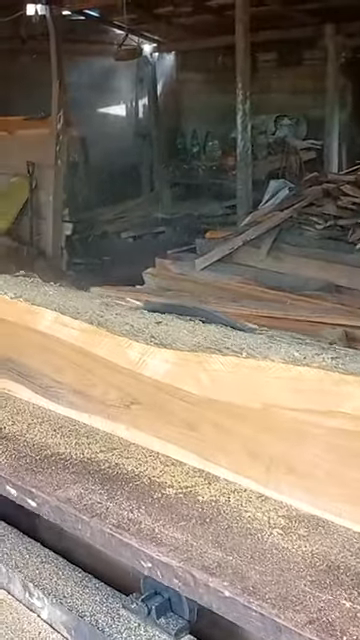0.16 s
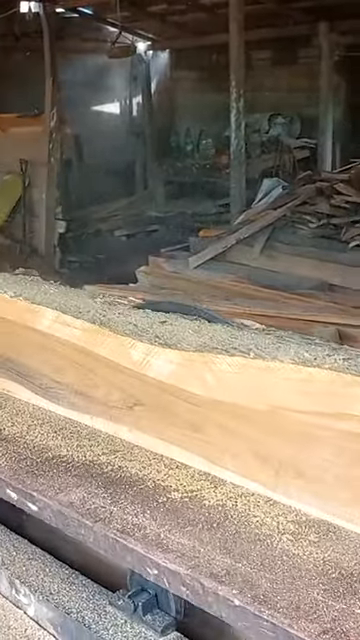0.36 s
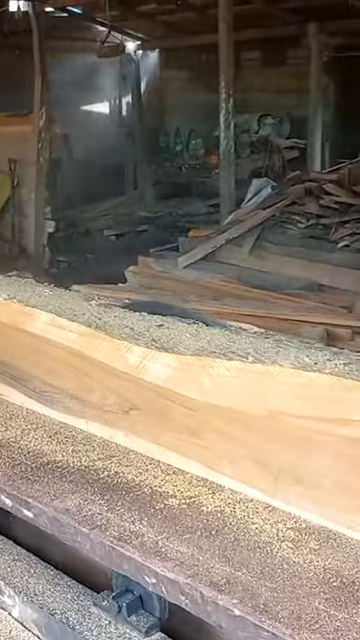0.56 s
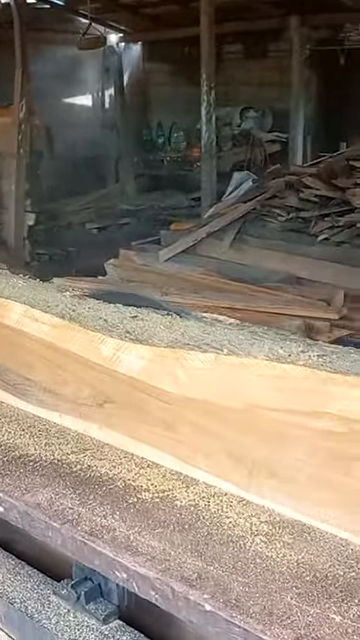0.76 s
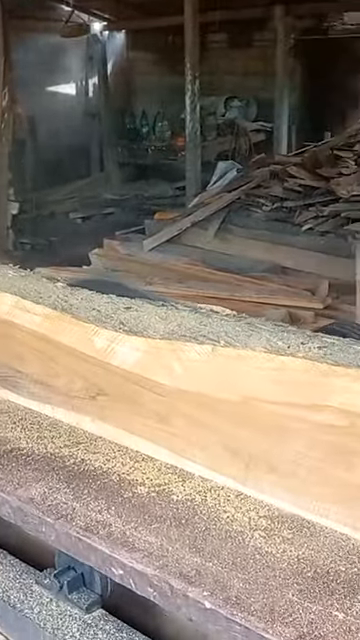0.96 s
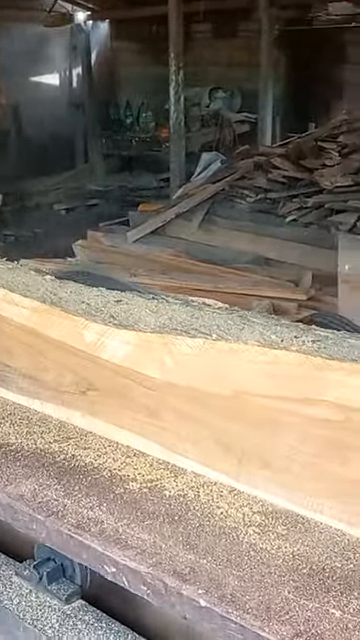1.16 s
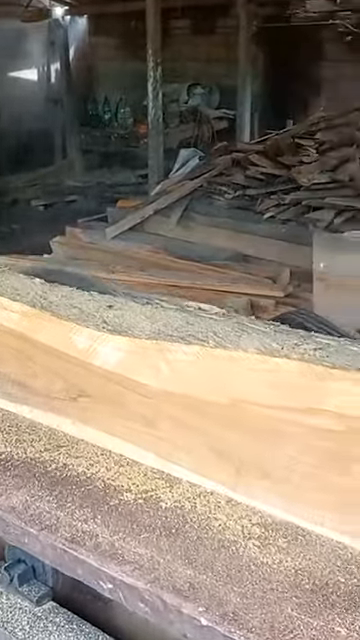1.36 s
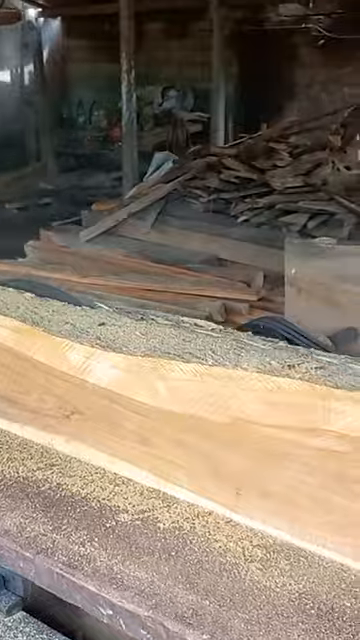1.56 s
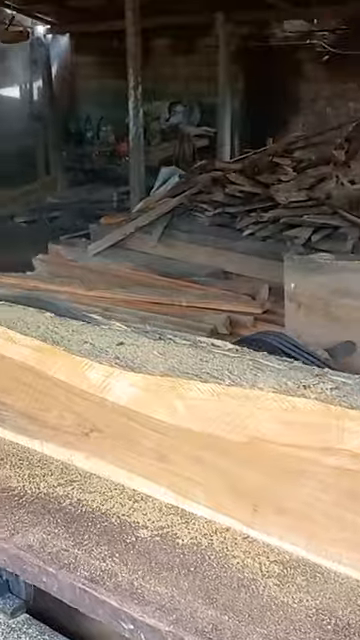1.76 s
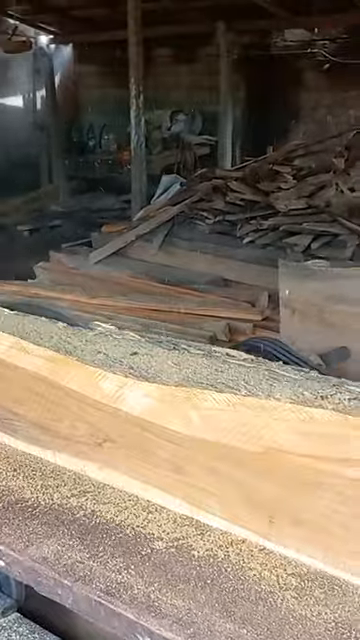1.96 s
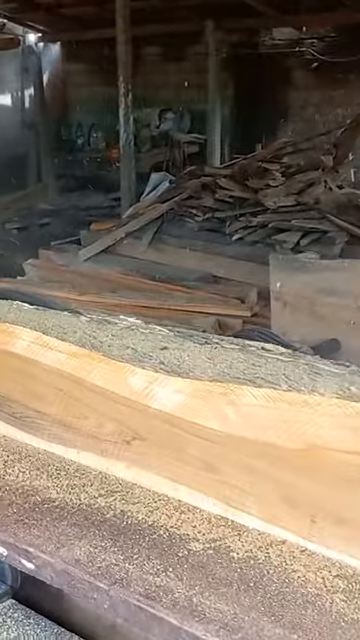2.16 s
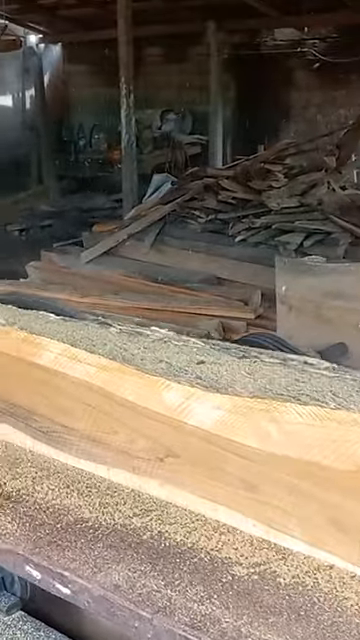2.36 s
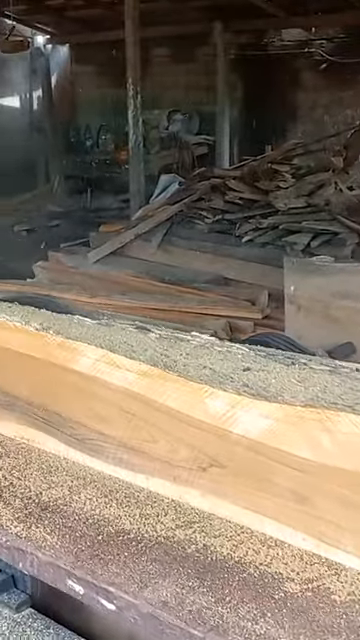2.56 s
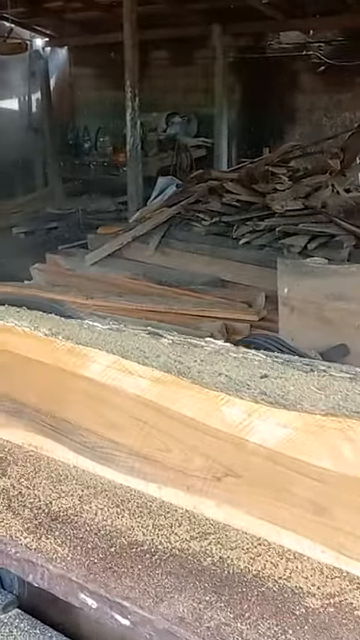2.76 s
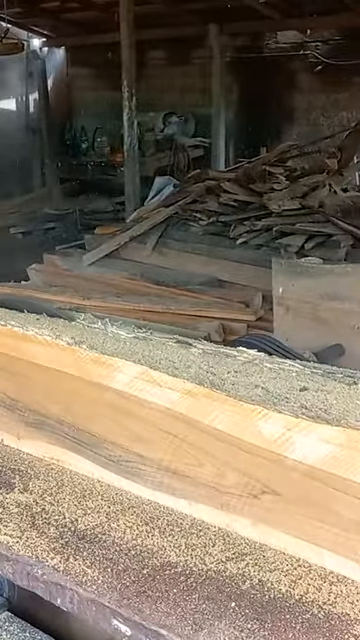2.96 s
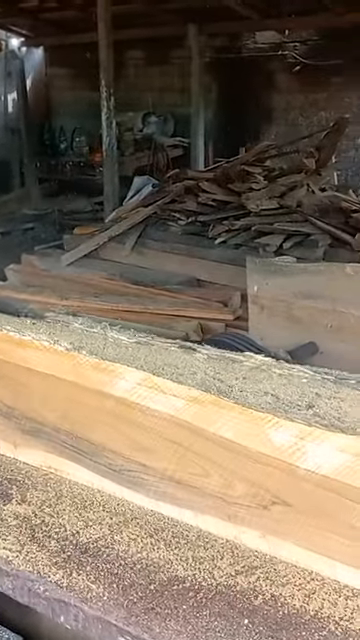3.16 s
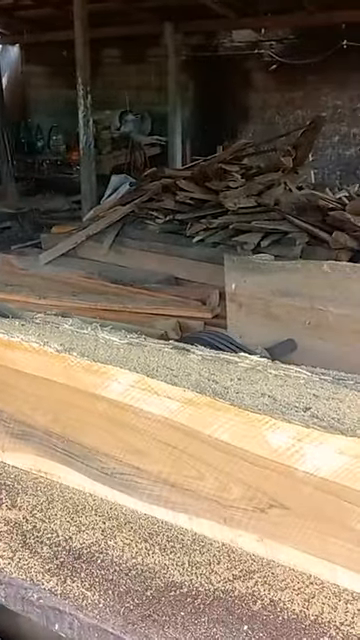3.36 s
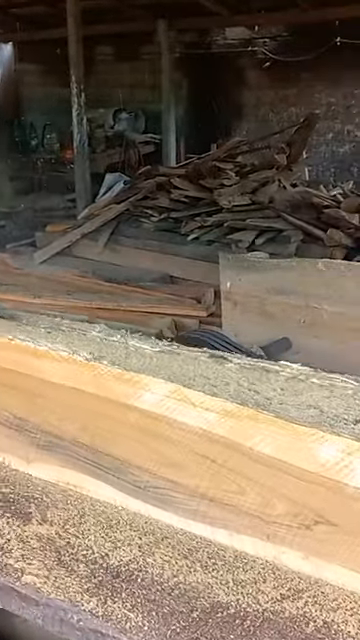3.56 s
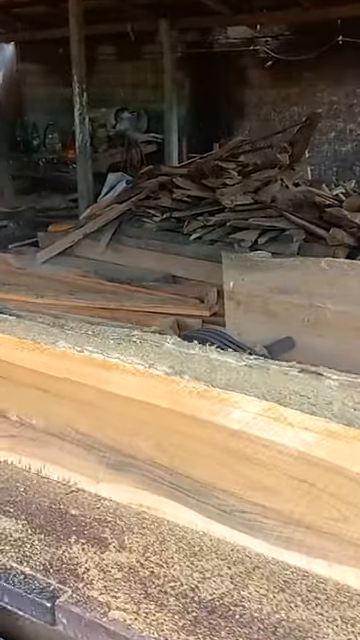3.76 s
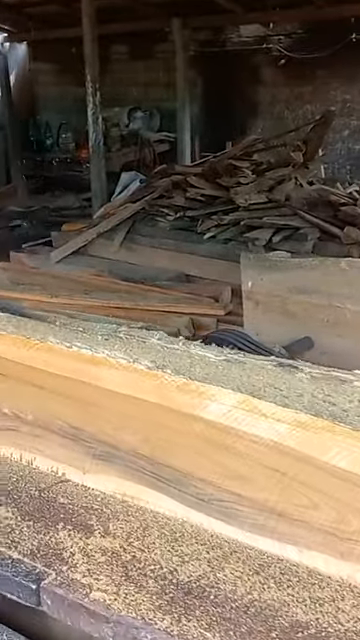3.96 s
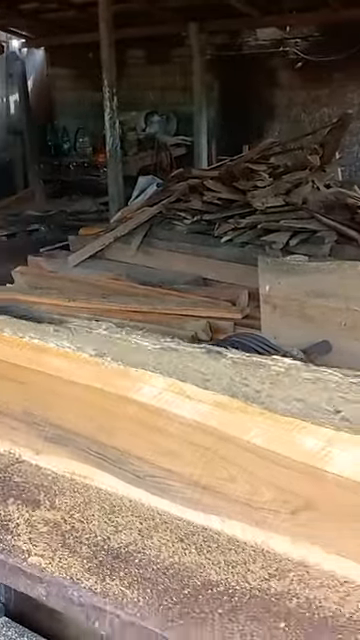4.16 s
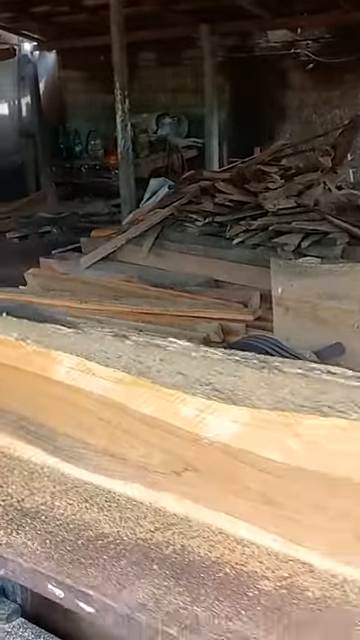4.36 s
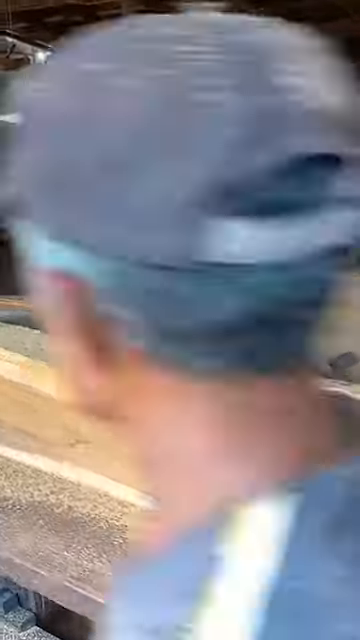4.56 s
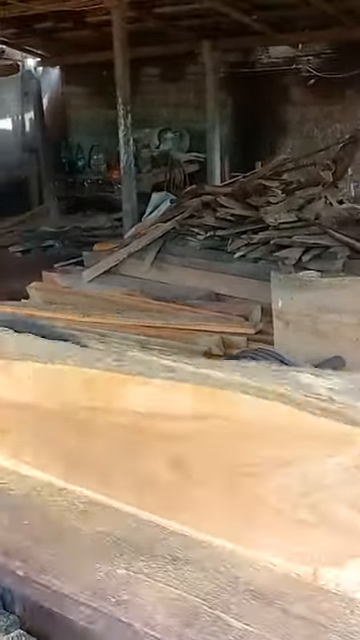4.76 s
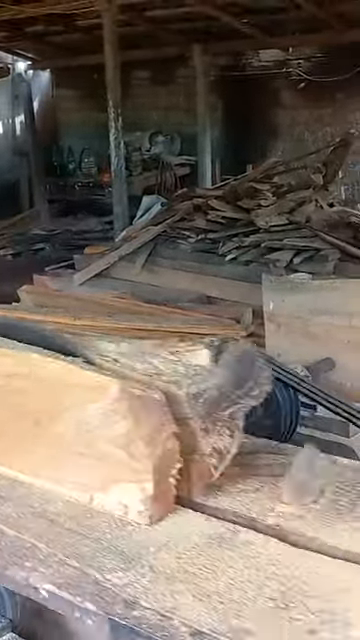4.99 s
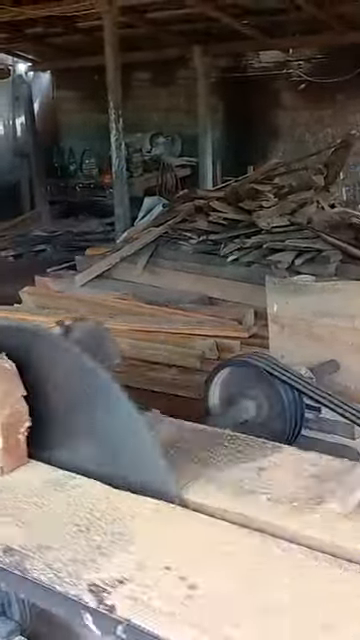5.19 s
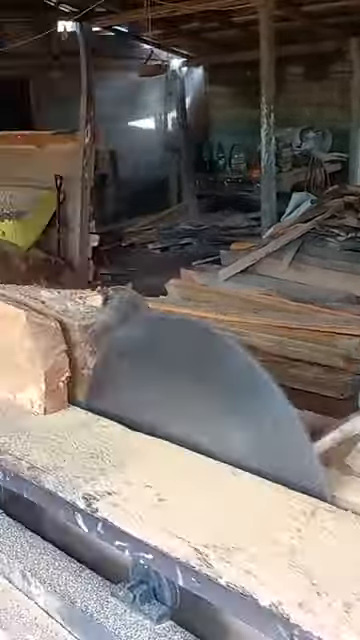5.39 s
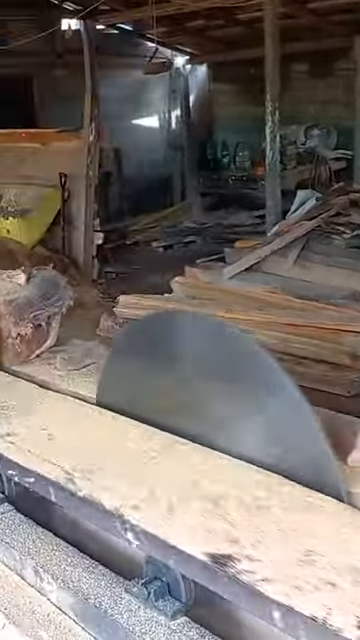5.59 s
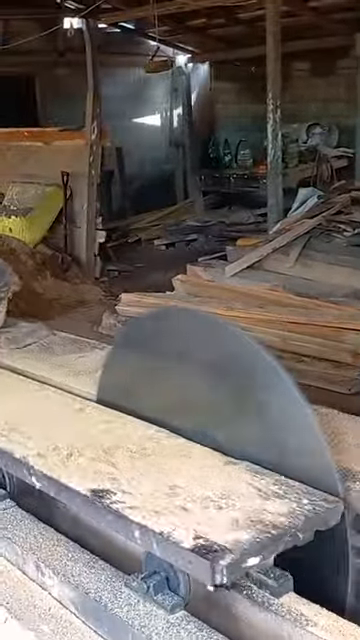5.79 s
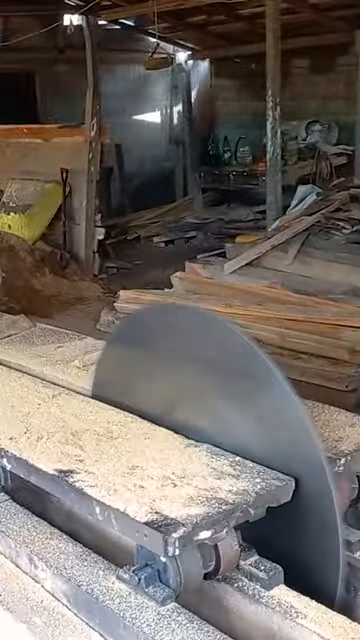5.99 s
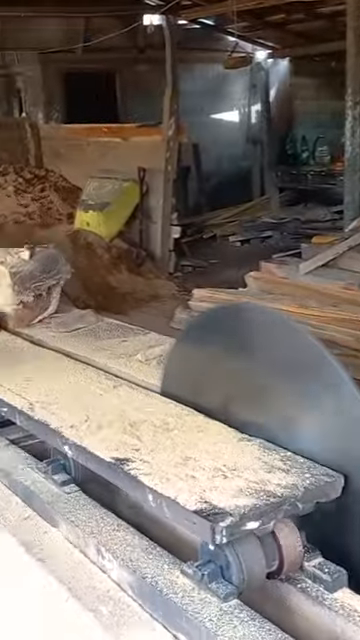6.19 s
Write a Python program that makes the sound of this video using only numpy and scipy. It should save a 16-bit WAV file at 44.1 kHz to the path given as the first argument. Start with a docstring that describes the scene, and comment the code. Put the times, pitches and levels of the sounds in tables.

```python
"""A large 30-tooth circular saw rips a plank in an open shed, a couple of metres from a phone.
Tearing fibres give noise bursts, the tooth rate gives harmonics, and scratches ring the blade's modes.
The feed surges, so the blade slows and bites harder in turn; then it skims the kerf and sings, and runs free.
Broad noise stands for the drive and wheels; the carriage knocks as decaying modes, squeaks as narrow hiss
near the top of hearing, and bangs at the end."""
import sys
import numpy as np
from scipy import signal
from scipy.fft import rfft, irfft
from scipy.io import wavfile
from scipy.ndimage import uniform_filter1d, map_coordinates

SR = 44100
rng = np.random.default_rng(int(sys.argv[2]) if len(sys.argv) > 2 else 0)


def nominal_scale(level):
    """Amplitude ratio for a level in decibels (scalar or array-like)."""
    x = np.asarray(level, float) / 20
    return 10 ** x


def transcribe(u):
    """Save the signal u as a 16-bit wav file named by the first command-line argument.

    u: samples, shape (n,) or (channels, n), limited to [-1, 1]; the rate is SR.
    q: integer samples, one column per channel.
    """
    v = np.clip(np.atleast_2d(u).T, -1, 1)
    q = np.round(v * 32767).astype(np.int16)
    wavfile.write(sys.argv[1], SR, q)


N = 274743
TIME = np.arange(N) / SR
BINS = np.maximum(np.arange(N // 2 + 1) * SR / N, 1)  # Hz

TEETH = 30
SKIM_S, SING_S, FREE_S = 3.65, 3.98, 4.89  # the blade skims the kerf, then sings, then runs free

# Blade speed with no push from the feed. Each row: time in seconds, tooth rate in Hz.
UNLOADED_SPEED = [(0, 1589), (3.62, 1589), (3.76, 1600), (4.85, 1599), (4.91, 1621)]
# Surges of the feed. Each row: start in seconds, length in seconds, sag of the tooth rate in Hz before smoothing.
FEED_SURGES = [(-.11, .17, 42), (.07, .19, 32), (.28, .18, 29), (.47, .15, 25), (.67, .2, 25),
               (.88, .18, 26), (1.06, .13, 23), (1.19, .16, 51), (1.43, .2, 38), (1.65, .16, 39),
               (1.83, .17, 44), (2.0, .39, 31), (2.4, .16, 40), (2.57, .18, 54), (2.78, .21, 54),
               (3.01, .17, 59), (3.17, .22, 31), (3.43, .3, 37)]
# Tearing between surges, before the load adds to it. Each row: time in seconds, level in dB.
TEARING_LEVEL = [(0, -22.5), (.8, -23), (2, -23), (3.3, -24), (3.7, -22), (3.9, -23.5), (4.0, -21),
                 (4.2, -17.5), (4.4, -21), (4.7, -19), (4.86, -21.5), (4.91, -39), (4.95, -55)]
# Spectrum of torn fibres and chips. Each row: frequency in Hz, relative density in dB per Hz.
TEARING_SPECTRUM = [(180, -57), (300, -23.5), (418, -12.5), (737, -14.5), (1560, -4), (2000, -5.5),
                    (2250, -1), (4830, -2), (7200, -5), (11300, -2.5), (16000, 3.5)]
# Modes of the blade plate. Each row: frequency in Hz, width of one resonance in Hz, relative level in dB.
BLADE_MODES = [(1080, 130, -5), (1350, 150, -11), (1860, 70, -6), (2240, 110, -1), (2600, 160, -6),
               (3220, 110, -7), (4710, 130, -9), (6880, 50, -12), (7930, 110, -11), (9570, 80, -4),
               (10080, 60, -5), (11100, 110, -3), (11700, 90, -9), (12700, 130, -9), (14200, 150, -9)]
# Lowest blade modes, until the blade runs free. Each row: time in seconds, level in dB.
LOWEST_MODES_LEVEL = [(0, -40), (.3, -31.5), (1.1, -39), (2.6, -37), (2.95, -29.5), (3.15, -34),
                      (3.45, -28.5), (3.88, -38), (4.2, -28.5), (4.7, -27), (4.95, -42)]
# Tooth tone in the wood, before load and slack.
# Each row: time in seconds, then first, second and third harmonic in dB.
TOOTH_HARMONICS = [(0, -41.5, -36, -32), (.35, -27.5, -32.5, -31.5), (.65, -35, -30, -32),
                   (1.0, -32, -30, -33.5), (1.3, -34.5, -37.5, -32), (1.6, -35.5, -38, -29),
                   (1.9, -48, -37.5, -33), (2.4, -41.5, -44, -32.5), (2.8, -47, -38, -39),
                   (2.9, -34, -34, -36), (3.05, -40, -37, -36), (3.42, -45.5, -42.5, -42),
                   (3.76, -35, -25.5, -34.5), (3.85, -47, -43, -49), (4.28, -38, -25.5, -33),
                   (4.45, -38.5, -40, -40), (4.7, -39, -25, -38), (4.9, -40, -43, -50)]
# Higher tooth harmonics, before slack and wavering. Each row: multiple of the tooth rate, dB against the tearing.
UPPER_HARMONICS = [(4, -17), (5, -15), (6, -20.5), (7, -12), (8, -11.5), (9, -13), (10, -13)]
# Spectrum of motor, belts, blade wind and carriage wheels. Each row: frequency in Hz, relative density in dB per Hz.
DRIVE_SPECTRUM = [(200, -25), (260, -20.5), (365, -5.5), (680, -11), (870, -6.5), (2300, -7), (3500, -8.5),
                  (4970, -7.5), (6000, -14), (11000, -19.5), (16000, -19.5)]
# The drive as heard: the phone's gain control lifts drive noise and whistle together after the cut
# and ducks them after the bang. Each row: time in seconds, reference level in dB.
DRIVE_AS_HEARD = [(0, -53), (2, -47), (3.95, -44.5), (4.5, -47.5), (4.93, -40), (5.2, -34.5), (5.5, -35),
                  (5.87, -32), (5.95, -39), (6.17, -40.5), (6.23, -31)]
# Carriage knocks and the end bang. Each row: start in seconds, peak in dB, brightness in Hz.
CARRIAGE_BLOWS = [(.912, -21.5, 1500), (1.012, -21, 1400), (1.112, -17.5, 1500), (1.217, -21, 1500),
                  (1.326, -15.5, 1900), (1.429, -11, 2570), (1.533, -18.5, 1400), (5.331, -12, 3500),
                  (5.349, -18, 3500), (5.8906, -5, 3800), (5.896, -4, 2400), (5.904, -9, 1910),
                  (5.913, -2.5, 3800), (5.918, -5, 3370), (5.928, -12, 3180)]
# Modes a knock excites. Each row: frequency in Hz, relative level in dB, 60 dB decay time in seconds.
FRAME_MODES = [(289.7, -8, 0.11), (434, -2, 0.047), (1035, 6.5, 0.027), (1406, 3.5, 0.026),
               (2010, -5, 0.089), (2394, -2, 0.035), (3184, 2.5, 0.025), (3450, -5, 0.026),
               (3930, -4, 0.059), (4520, -6.5, 0.049)]
# Thin squeaks while the carriage rolls. Each row: start in seconds, length in seconds, level in dB.
CARRIAGE_SQUEAKS = [(4.925, 0.12, -33), (5.155, .12, -31), (5.33, 0.058, -33), (5.41, 0.077, -26),
                    (5.547, .05, -34), (5.6, .07, -36)]
# Left-right difference against the sum. Each row: frequency in Hz, level in dB.
STEREO_WIDTH = [(100, -8), (250, -16), (700, -11), (1290, -20), (2380, -14.5), (4400, -6.5), (8120, -0.5),
                (15000, -1)]


def curves(table):
    """Linear interpolation: the columns of a table, joined by straight lines in time."""
    s, *columns = np.transpose(table)
    return [np.interp(TIME, s, c) for c in columns]


def unit(x):
    """Normalization: scale to rms 1."""
    return x / np.sqrt(np.mean(x ** 2))


def colour(x, points):
    """Spectral shaping: weight each frequency by (Hz, dB) points joined on a log axis."""
    hz, db = np.transpose(points)
    return irfft(rfft(x) * nominal_scale(np.interp(np.log(BINS), np.log(hz), db)), N)


def ring(x, hz, width_hz):
    """Resonance: a two-pole filter with gain 1 at the centre."""
    return signal.lfilter(*signal.iirpeak(min(hz, .45 * SR), hz / width_hz, SR), x)


def walk(rate):
    """Random modulation: levels held for 1 / rate seconds and slewed twice, scaled to rms 1."""
    k = int(SR / rate)
    held = np.repeat(rng.standard_normal(N // k + 1), k)[:N]
    return unit(uniform_filter1d(uniform_filter1d(held, k), k))


def tooth_rate():
    """Inertia: each surge drags the blade down, it recovers a little faster, and its mass rounds the corners."""
    sag = 0
    for s, length, sag_hz in FEED_SURGES:
        bite_s = min(.55 * length, .13)
        ease_s = min(.38 * length, .1)
        surge = np.minimum((TIME - s) / bite_s, (s + length - TIME) / ease_s)
        sag = sag + sag_hz * np.clip(surge, 0, 1)
    return curves(UNLOADED_SPEED)[0] - uniform_filter1d(sag, int(.04 * SR))


def scratch(turns, memory, fresh):
    """Periodicity: noise that returns every turn and slowly changes, mixed by power with new noise."""
    size = 28 * TEETH  # noise points around the rim
    keep = np.exp(-1 / memory)  # memory in turns
    rim = signal.lfilter([1], [1, -keep], rng.standard_normal((400, size)), axis=0)
    rim = rim[40:].ravel()  # the first turns only settle the filter
    again = unit(map_coordinates(rim, [turns * size], order=3))
    fresh = np.clip(fresh, 0, 1)
    return np.sqrt(1 - fresh) * again + np.sqrt(fresh) * rng.standard_normal(N)


def runout(turns, depth_db, lobe_db):
    """Amplitude modulation by rotation: the blade is not true, so some teeth bite deeper on every turn."""
    once = depth_db * np.cos(2 * np.pi * turns)
    thrice = lobe_db * np.cos(2 * np.pi * 3 * turns)
    return nominal_scale(once + thrice)


def tearing(turns, load, tear_db):
    """Random fracture: fibres tear in bursts of uneven size, and bands of the noise flicker on their own."""
    again = scratch(turns, memory=12.0, fresh=.6 + .1 * load)
    chips = nominal_scale(2.3 * walk(900)) * again * runout(turns, depth_db=1.47, lobe_db=-0.7)
    torn = unit(colour(chips, TEARING_SPECTRUM))
    bands = sum(nominal_scale(2.73 * walk(8)) * ring(torn, hz, 0.35 * hz) for hz in 400 * 1.35 ** np.arange(12))
    return nominal_scale(tear_db - 3.0) * bands


def blade(turns, load, tear_db):
    """Plate resonance: the repeating scratch rings the blade's modes, whose levels waver at random."""
    # fresh wood under load breaks the repeat
    again = scratch(turns, memory=16.0, fresh=.1 + .25 * load)
    push = again * runout(turns, depth_db=2.0, lobe_db=0.8)
    lowest_db = curves(LOWEST_MODES_LEVEL)[0] - 30.0 * np.clip((TIME - FREE_S) / .3, 0, 1)
    # dB against the tearing: weaker in the wood, stronger when singing
    sing_times = [SING_S - .02, SING_S + 0.022]
    low_db = tear_db + np.interp(TIME, sing_times, (-12, -7))
    high_db = tear_db + np.interp(TIME, sing_times, (-11.5, -6.5))
    out = 0
    for hz, width_hz, db in BLADE_MODES:
        mode_course_db = lowest_db if hz < 1500 else low_db if hz < 4000 else high_db
        waver_db = 2.0 * walk(8)
        # the second, wider resonance makes the skirts fall faster
        mode = unit(ring(ring(push, hz, width_hz), hz, 3.0 * width_hz))
        out = out + nominal_scale(db + mode_course_db + waver_db) * mode
    return out


def tooth_tone(turns, load, tear_db):
    """Periodic forcing: harmonics of the tooth rate; the overtones grow with load and weaken in slack."""
    first, second, third = curves(TOOTH_HARMONICS)
    # out of the wood the teeth whistle in the air, under the same gain control as the drive noise
    free = np.clip((TIME - FREE_S) / 0.027, 0, 1)
    heard_db = curves(DRIVE_AS_HEARD)[0]
    first = first + free * (heard_db + 2.5 - first)
    second = second + free * (heard_db - 10.5 - second)
    third = third - 12.0 * free
    # only between surges, when the feed eases, does the blade lift off the wood
    slack = np.clip(2.5 * (.45 - load), 0, 1) * (TIME < SKIM_S)
    levels = [(1, first), (2, second + 2.7 * load - 10.0 * slack), (3, third + 2.15 * load - 13.0 * slack)]
    upper_drop_db = 18.0 * np.maximum(slack, TIME > SKIM_S)
    levels += [(k, db + tear_db - upper_drop_db + 3.6 * walk(9.01)) for k, db in UPPER_HARMONICS]
    # uneven teeth shift each bite by a pattern that comes back every turn; high multiples smear most
    pattern = scratch(turns, memory=3.9, fresh=0.4)
    uneven = unit(uniform_filter1d(uniform_filter1d(pattern, 90), 90))
    # in the wood the same pattern, 300 samples later, sets how hard each tooth bites
    bite = 1 + .45 * np.roll(uneven, 300) * np.clip(nominal_scale(tear_db + 30), 0, 1)
    out = 0
    for k, db in levels:
        wobble = k ** 2 * (.025 * uneven + .006 * walk(60))  # radians
        wave = np.sqrt(2) * np.sin(k * 2 * np.pi * TEETH * turns + wobble)
        out = out + nominal_scale(db + 1.2 * walk(25)) * bite * wave
    return out


def drive():
    """Broadband radiation: shaped machine noise in bands that flicker independently."""
    hum = colour(nominal_scale(1.57 * walk(500)) * rng.standard_normal(N), DRIVE_SPECTRUM)
    bands = sum(nominal_scale(1.2 * walk(12)) * ring(hum, hz, .5 * hz) for hz in 250 * 1.505 ** np.arange(11))
    return nominal_scale(curves(DRIVE_AS_HEARD)[0] + 8.5) * unit(bands)


def knocks():
    """Impact: a crack, then rattling frame modes near its brightness; the lows build over a few cycles."""
    t = TIME[:SR // 6]
    out = np.zeros(N + len(t))
    for s, db, bright_hz in CARRIAGE_BLOWS:
        burst = rng.standard_normal(len(t)) * np.exp(-t / 0.001)
        crack = ring(burst, 1.1 * bright_hz, 5.2 * bright_hz)
        blow = 0.75 * crack / abs(crack).max()
        for (hz, mode_db, t60), start in zip(FRAME_MODES, rng.random(len(FRAME_MODES))):
            # modes far from the brightness weaken; below 500 Hz a brighter blow excites less
            reach_db = -6.0 * np.log2(hz / bright_hz) ** 2 if hz > 500 else -bright_hz / 600
            shape = (1 - np.exp(-t * hz / 2.0)) * nominal_scale(-60 * t / t60)
            tone = np.sin(2 * np.pi * (hz * t + start))
            rattle = unit(ring(rng.standard_normal(len(t)), hz, .12 * hz)) * min(hz / 1500, 1)
            blow = blow + nominal_scale(mode_db + reach_db) * shape * (tone + rattle)
        out[int(s * SR):][:len(t)] += nominal_scale(db) * blow / abs(blow).max()
    return out[:N]


def squeaks():
    """Narrow-band noise: gated, chattering hiss near the top of hearing."""
    gate = 0
    for s, length, db in CARRIAGE_SQUEAKS:
        gate = gate + nominal_scale(db) * np.clip(4.0 * (1 - abs(2 * (TIME - s) / length - 1)), 0, 1)
    hiss = ring(ring(rng.standard_normal(N), 15720, 300), 15720, 300)
    return gate * nominal_scale(3.0 * walk(120)) * unit(hiss)


def scene():
    """Superposition: the sum at the phone, and a second draw of the noises for what differs between its ports."""
    hz = tooth_rate()
    turns = np.cumsum(hz) / (SR * TEETH)
    # the harder the feed pushes, the more the blade slows
    load = np.clip((1590 - hz) / 30, 0, 1.5)
    tear_db = curves(TEARING_LEVEL)[0] + 0.99 * load
    tone = tooth_tone(turns, load, tear_db)
    blows = knocks()
    mid, other = (tearing(turns, load, tear_db) + blade(turns, load, tear_db) + drive() + squeaks()
                  for _ in range(2))
    # tones and blows reach the side path 9 samples late
    side = colour(other + np.roll(tone + blows, 9), STEREO_WIDTH)
    return mid + tone + blows + side * np.array([[1], [-1]])


def roll_off(x):
    """The treble ends steeply here."""
    return signal.sosfilt(signal.butter(12, 16460, fs=SR, output="sos"), x)


def record(dry):
    """Saturation and band limiting: the phone rounds the peaks, cuts the bass steeply and cuts the top."""
    x = np.tanh(0.64 * dry) / 0.56
    bass = signal.butter(6, 270, "highpass", fs=SR, output="sos")
    # a faint rumble, added past the bass cut, is mostly alike in both channels
    noise = rng.standard_normal(x.shape) + 1.88 * rng.standard_normal(N)
    rumble = nominal_scale(-55.5 + 0.92 * walk(4.06)) * ring(noise, 160, 310)
    top = signal.ellip(12, .2, 70, 15760, fs=SR, output="sos")
    mix = signal.sosfilt(np.vstack([bass, top]), x) + rumble
    return roll_off(mix)


dry = scene()
out = record(dry)
transcribe(out)
```